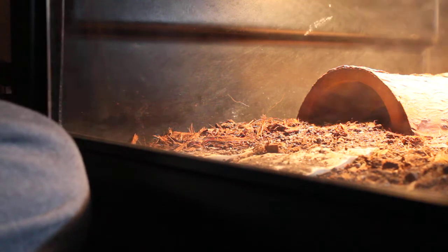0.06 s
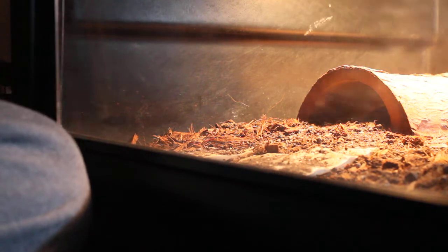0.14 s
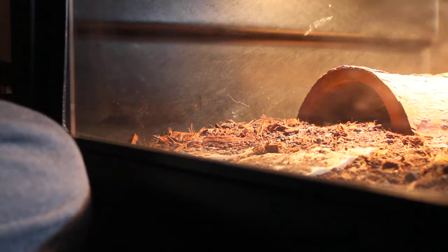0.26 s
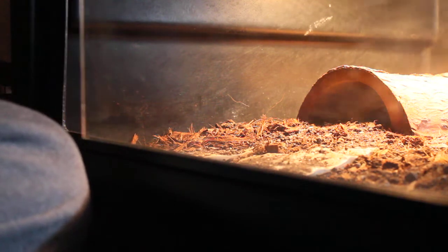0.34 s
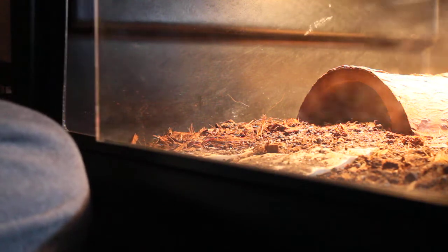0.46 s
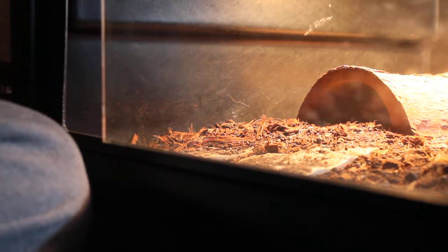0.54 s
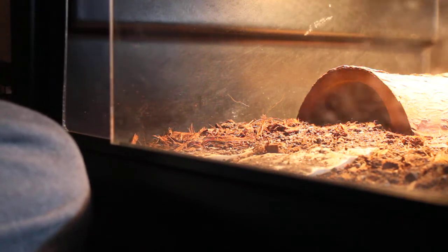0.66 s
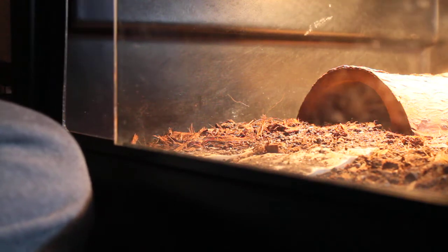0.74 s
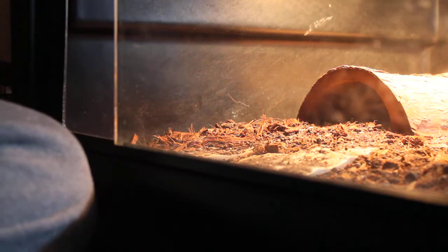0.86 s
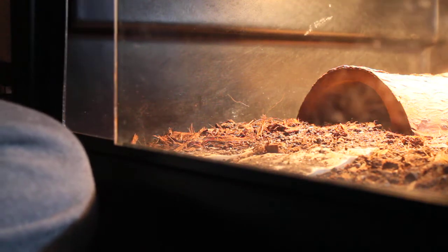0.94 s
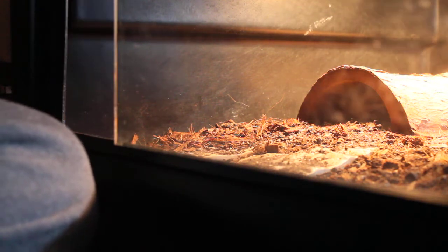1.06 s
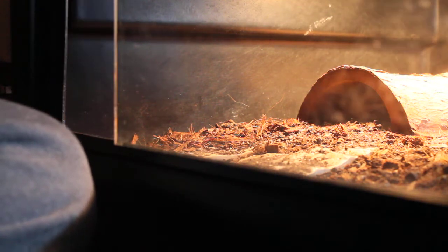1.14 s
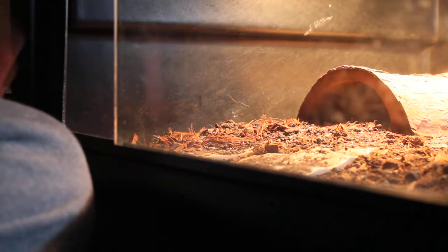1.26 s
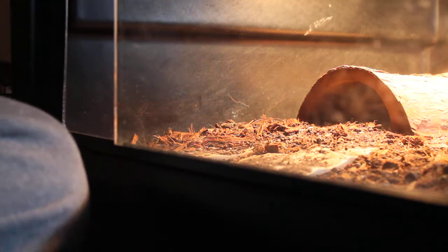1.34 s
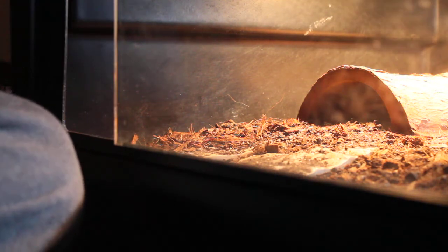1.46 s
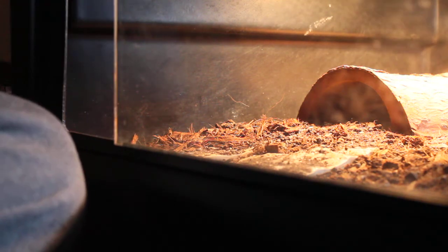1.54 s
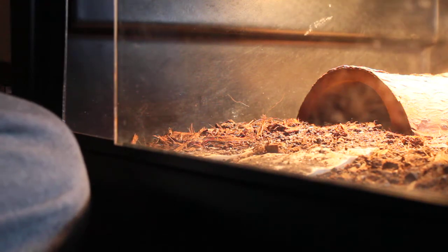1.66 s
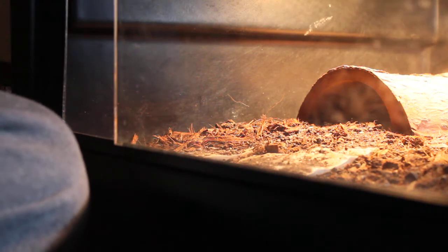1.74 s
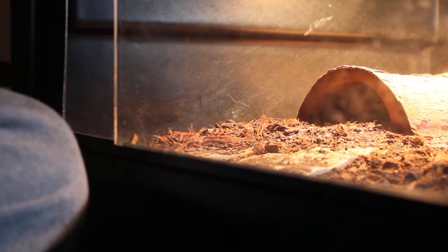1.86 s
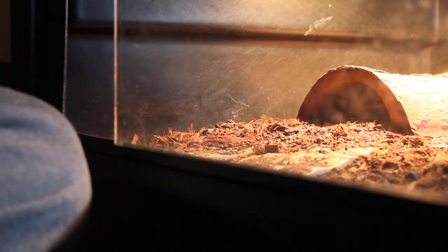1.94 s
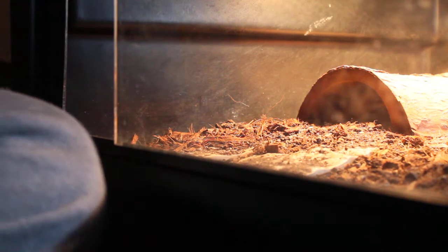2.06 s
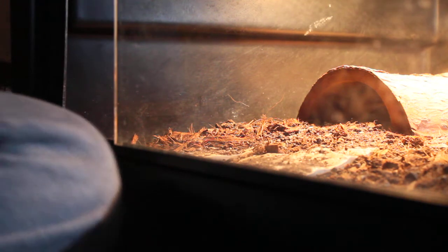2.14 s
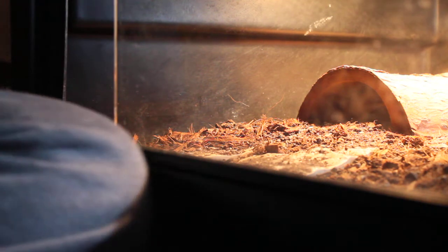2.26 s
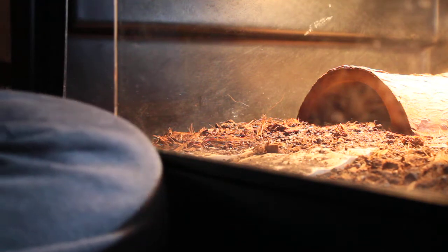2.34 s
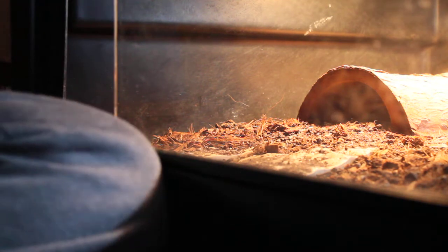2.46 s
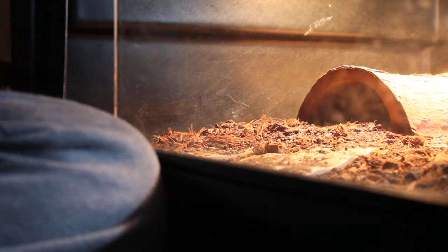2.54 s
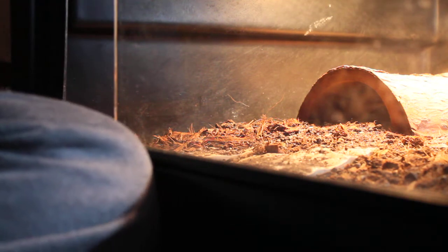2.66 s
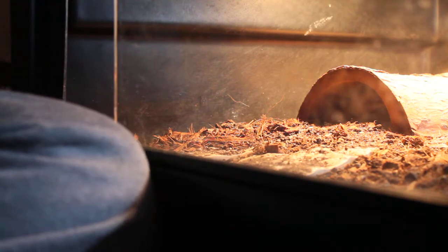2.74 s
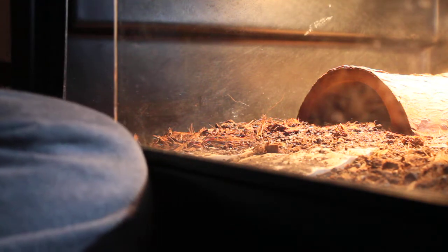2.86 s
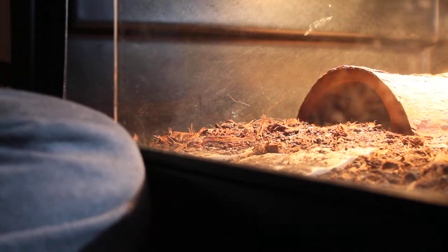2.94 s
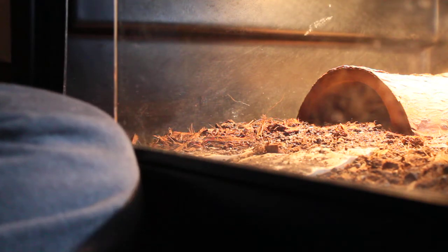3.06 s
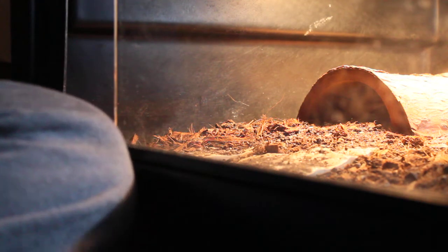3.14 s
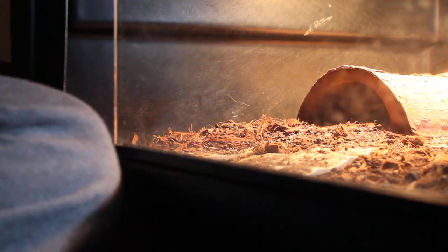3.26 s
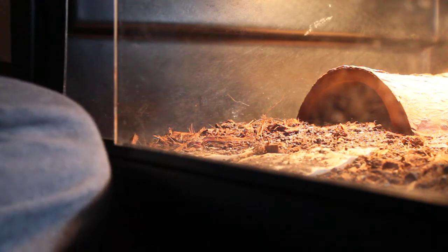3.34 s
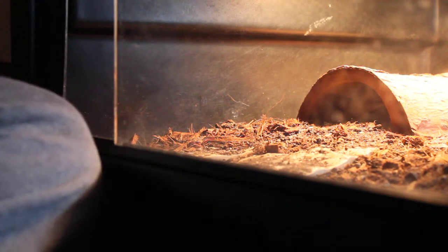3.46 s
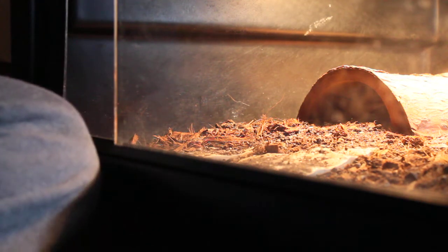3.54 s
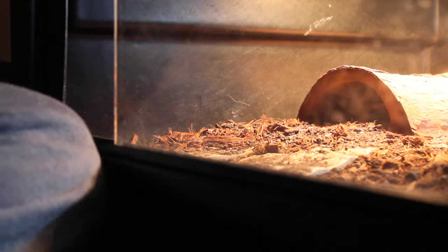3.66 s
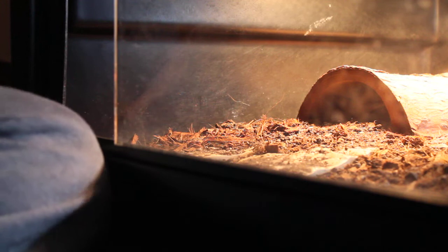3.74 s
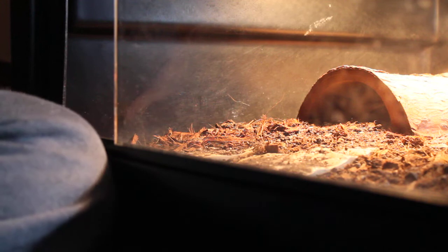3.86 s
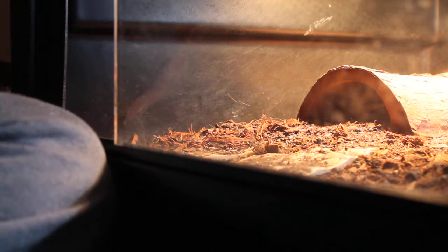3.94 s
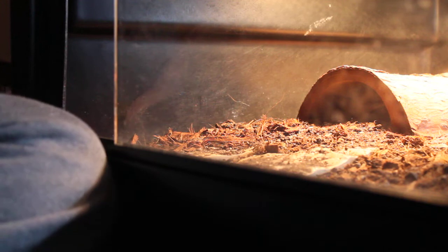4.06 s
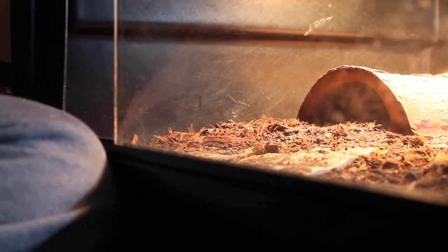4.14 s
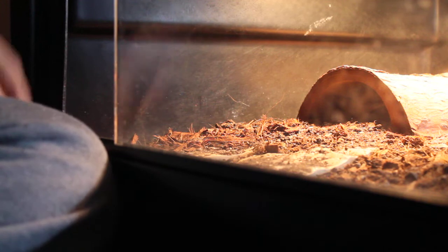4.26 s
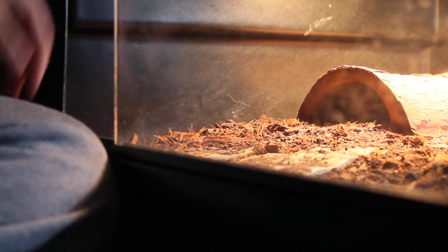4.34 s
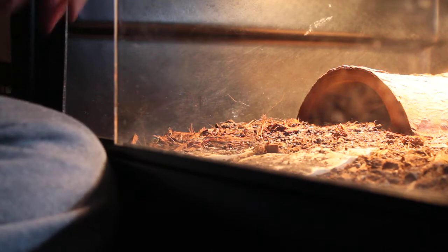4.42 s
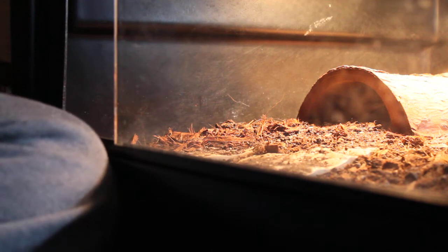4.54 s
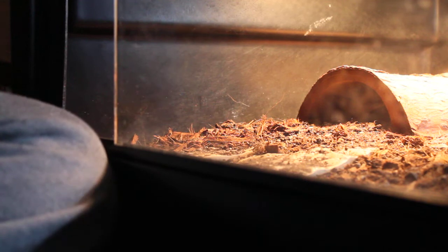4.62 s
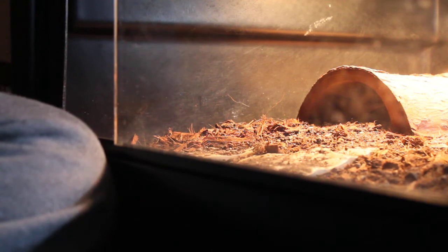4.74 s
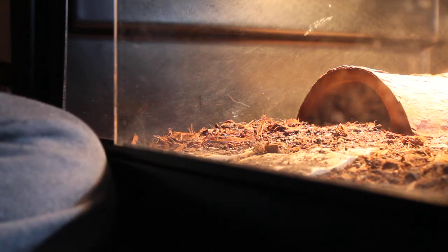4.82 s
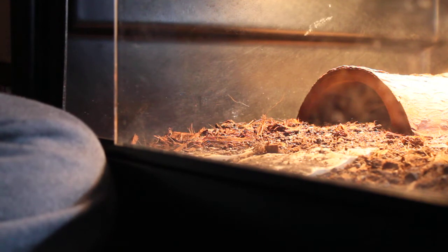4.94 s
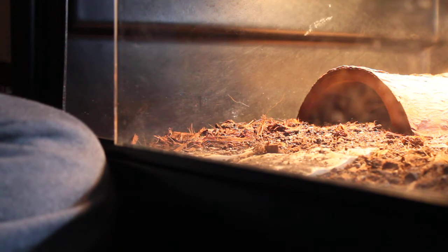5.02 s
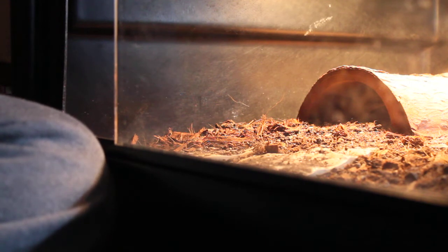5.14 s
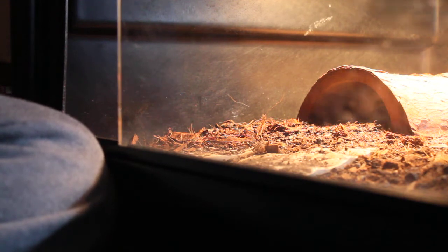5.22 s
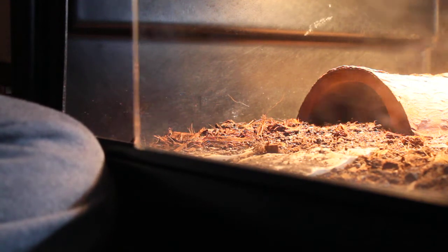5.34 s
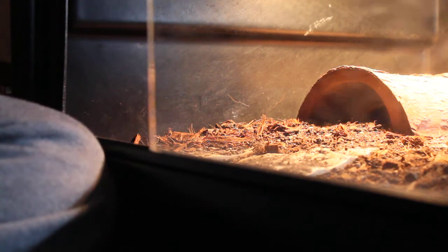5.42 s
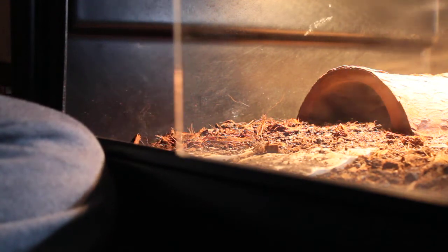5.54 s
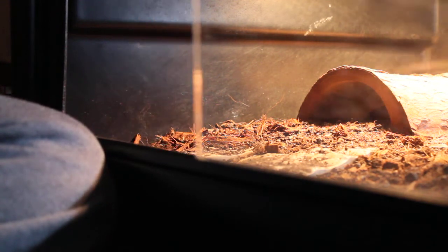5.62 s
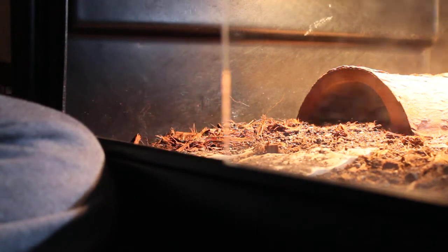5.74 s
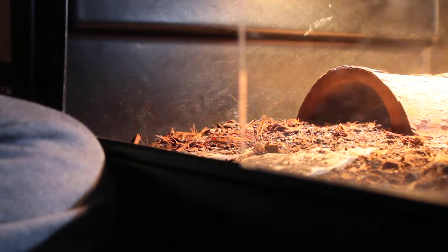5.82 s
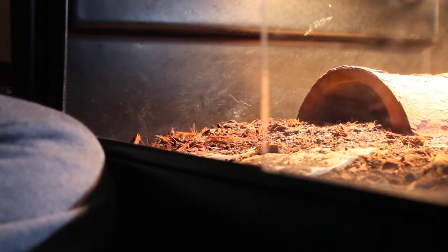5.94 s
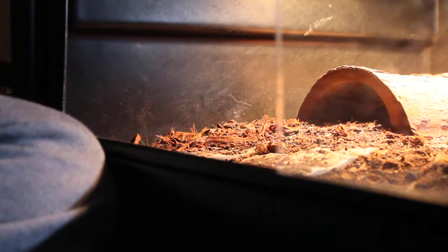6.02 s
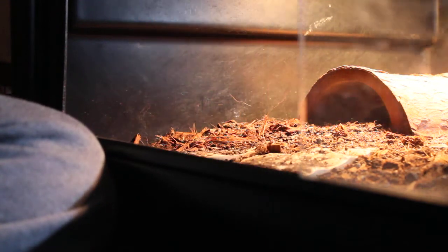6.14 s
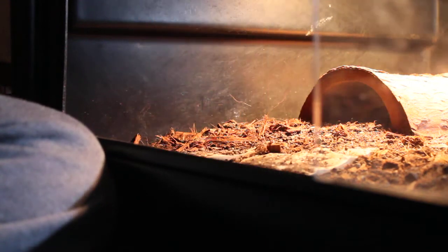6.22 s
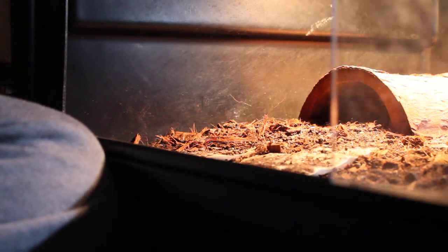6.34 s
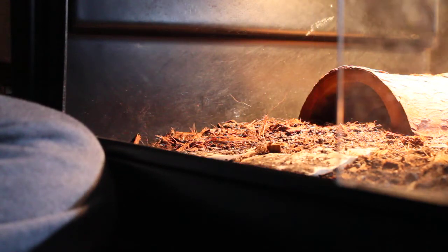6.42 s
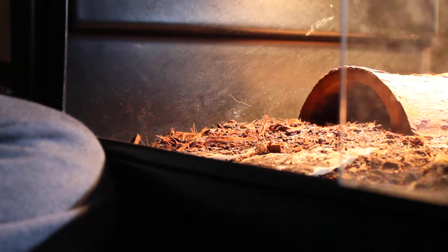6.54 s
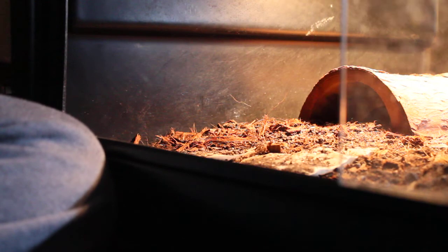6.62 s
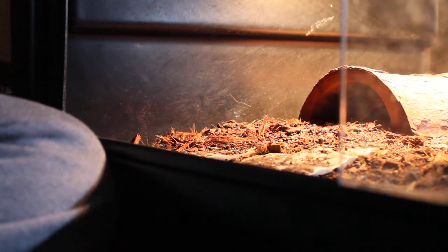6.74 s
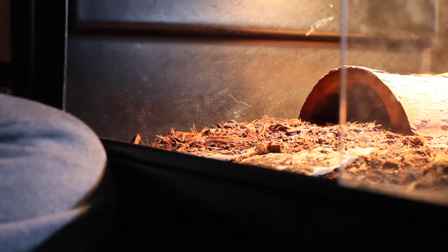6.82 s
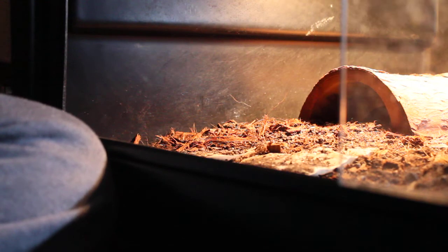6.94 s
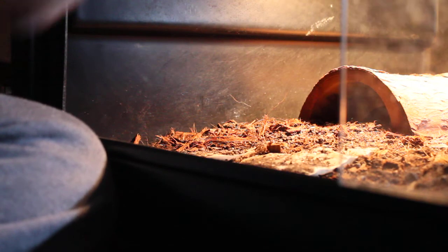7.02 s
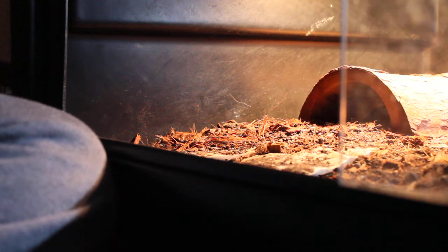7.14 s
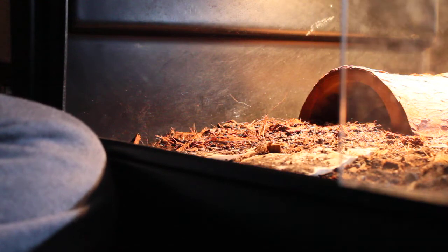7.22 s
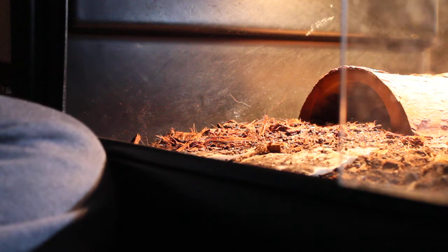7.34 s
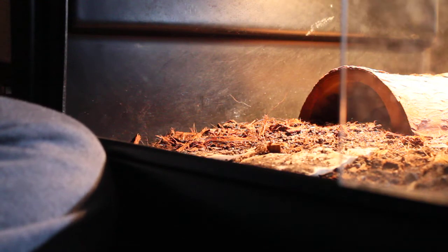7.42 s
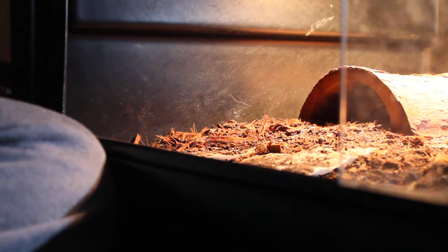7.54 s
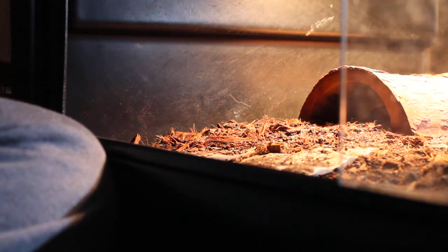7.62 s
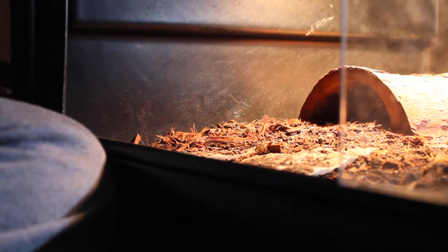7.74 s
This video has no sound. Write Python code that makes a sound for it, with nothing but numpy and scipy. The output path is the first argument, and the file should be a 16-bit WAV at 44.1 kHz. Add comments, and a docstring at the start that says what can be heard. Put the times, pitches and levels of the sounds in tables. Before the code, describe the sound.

Close up in a quiet room, a sliding glass door scrapes along a gritty track, chattering with bright clicks, then knocks its ringing frame. Clothing rustles, a cabinet is softly bumped and creaks, and one dry snap cuts through. A second glass door starts with a groan and brief squeal, scrapes for about a second, and rocks in its groove with several fading knocks.

```python
"""Quiet room: two glass doors of a terrarium are pushed along their gritty plastic track.
The first scrapes, chatters amid sharp clicks and is knocked against the frame; a knee shifts in cloth and
bumps the creaking cabinet; one dry snap; the second door slides with a groan and squeal, then rocks in its groove.
Scrapes are random catches filtered by pane resonances; blows are noise thuds with tails and decaying modes;
cloth and room hush are coloured noise.
"""
import sys
import numpy as np
from scipy import signal
from scipy.fft import rfft, irfft, next_fast_len
from scipy.io import wavfile
from scipy.ndimage import map_coordinates

SR = 44100
rng = np.random.default_rng(int(sys.argv[2]) if len(sys.argv) > 2 else 0)


def output_pcm(signal):
    """Save a mono or channel-first signal as 16-bit PCM at the path in sys.argv[1].

    Samples are clipped to [-1, 1] before scaling.
    """
    pcm = np.clip(np.atleast_2d(signal).T, -1, 1) * 32767
    wavfile.write(sys.argv[1], SR, np.round(pcm).astype(np.int16))


N = 343098
TIME = np.arange(N) / SR


def from_db(db):
    """Decibels as gain."""
    return 10 ** (np.asarray(db) / 20)


def rms_one(x):
    """The same sound at rms 1."""
    return x / np.sqrt(np.mean(x ** 2) + 1e-20)


def at_hz(points, hz):
    """A table read on a log-frequency axis."""
    freqs, values = np.transpose(points)
    return np.interp(np.log(np.maximum(hz, 1)), np.log(freqs), values)


def gain_curve(s, level_db):
    """Gain over time, fading at 600 dB/s outside the first and last point."""
    outside_s = np.maximum(s[0] - TIME, 0) + np.maximum(TIME - s[-1], 0)
    return from_db(np.interp(TIME, s, level_db) - 600 * outside_s)


def swell(s, rise_s, fall_s):
    """Gaussian hump of height 1; rise and fall are 1/e times."""
    out = np.zeros(N)
    near = slice(*np.searchsorted(TIME, [s - 4 * rise_s, s + 4 * fall_s]))
    t = TIME[near] - s
    out[near] = np.exp(-(t / np.where(t < 0, rise_s, fall_s)) ** 2)
    return out


def cut(x, hz, kind, order=2):
    """Butterworth low-, high- or band-pass."""
    sos = signal.butter(order, np.clip(hz, 10, .45 * SR), kind, fs=SR, output="sos")
    return signal.sosfilt(sos, x + 1e-18)


def colour(x, spectrum, resonances=()):
    """Minimum-phase filter: broad spectrum plus resonances (centre Hz, width Hz, lift dB)."""
    size = 2 * next_fast_len(len(x) // 2 + 4096)
    hz = np.arange(size // 2 + 1) * SR / size
    shape_db = at_hz(spectrum, hz)
    for centre_hz, width_hz, lift_db in resonances:
        shape_db = shape_db + lift_db / (1 + (2 * (hz - centre_hz) / width_hz) ** 2)
    cepstrum = irfft(np.log(from_db(shape_db)))[:size // 2]
    cepstrum[1:] *= 2  # folding makes the filter causal
    response = np.exp(rfft(cepstrum, size))
    return irfft(rfft(x, size) * response)[:len(x)]


def drift(knots_per_s):
    """Slow chance: straight lines between normal random knots."""
    knots = rng.standard_normal(int(N / SR * 400) + 2)
    return np.interp(TIME * knots_per_s, np.arange(len(knots)), knots)


def grains(per_s, spread_db):
    """Clicks at random moments and signs; sizes scatter upward, small ones most often."""
    sizes = from_db(spread_db * np.minimum(rng.exponential(1, N), 4.5))
    signs = rng.choice([-1, 1], N)
    return rms_one(sizes * signs * (rng.random(N) < per_s / SR))


# ringing of tank and room: (frequency [Hz], t60 [s])
TAIL_T60 = [(100, 1), (500, 0.5), (1840, 0.58), (14000, 0.39)]


def tail(stretch=1):
    """One second of dense ringing of tank and room: noise bands, the bass lasting longest."""
    t, white = TIME[:SR], rng.standard_normal(SR)
    edges_hz = np.geomspace(30, SR / 2, 11)
    bins, hz = rfft(white), np.arange(SR // 2 + 1)
    out = np.zeros(SR)
    for low, high in zip(edges_hz, edges_hz[1:]):
        t60_s = stretch * at_hz(TAIL_T60, np.sqrt(low * high))
        out += irfft(bins * (hz >= low) * (hz < high), SR) * from_db(-60 * t / t60_s)
    return out


def add(out, s, sound):
    """Mix a sound in at a given moment."""
    start = max(round(s * SR), 0)
    out[start:start + len(sound)] += sound[:N - start]


# hush colour: (frequency [Hz], density [dB per Hz])
AIR_COLOUR = [(25, -39), (55, -8.5), (110, -9.5), (330, -4), (800, -9.5), (1450, -8.5), (4200, -12.5),
              (9000, -21), (15500, -30)]
AIR_DB = -59


def air():
    """The steady hush of the room: coloured noise."""
    return from_db(AIR_DB) * rms_one(colour(rng.standard_normal(N), AIR_COLOUR))


def wander(x, depth_db, spacing_hz, changes_per_s):
    """The pane bears on new spots, so its close-packed modes swell and sink each in its own time."""
    hz, s, frames = signal.stft(x, SR, nperseg=2048)
    chance = rng.standard_normal((512, 256))
    grid = np.meshgrid(hz / spacing_hz, s * changes_per_s, indexing="ij")
    strengths = map_coordinates(chance, grid, order=1, mode="wrap")
    return signal.istft(frames * from_db(depth_db * strengths), SR)[1][:N]


# pane binds on rough track and judders harder:
# (time [s], 1/e half-length [s], lift [dB], centre [Hz], 1/e spread [octaves])
BINDS = [(0.216, 0.057, 5, 1780, 2.4), (0.36, 0.066, 10, 1220, 1.16), (0.52, 0.11, 5.5, 206, 3.1),
         (0.714, 0.071, 10.5, 402.5, 2.3), (5.3, 0.14, 13.5, 690, 1.06), (5.355, 0.07, 8, 1750, 0.3),
         (5.7, 0.071, 3.5, 594, 4.2), (6.214, 0.037, 9.5, 222, 1.8), (6.325, 0.087, 11, 372, 3.85),
         (6.472, 0.064, 9.5, 280, 2.5)]


def push_gain(push, follows, hz):
    """Gain of one register: rises with speed, sags, lifts where the pane binds, dies after the stop."""
    start_s, rise_s, slowing_db_per_s, stop_s, braking_db_per_s = push
    slowing_share, braking_share = follows
    speed = np.sin(np.pi / 2 * np.clip((TIME - start_s) / rise_s, 0, 1)) ** 2
    slowed_db = slowing_share * slowing_db_per_s * np.maximum(TIME - start_s - rise_s, 0)
    braked_db = braking_share * braking_db_per_s * np.maximum(TIME - stop_s, 0)
    bound_db = np.zeros(N)
    for s, half_s, lift_db, centre_hz, octaves in BINDS:
        nearness = np.exp(-(np.log2(hz / centre_hz) / octaves) ** 2)
        bound_db += lift_db * nearness * swell(s, half_s, half_s)
    return speed * from_db(bound_db - slowed_db - braked_db)


# glass scraping in the track: (frequency [Hz], density [dB per Hz])
SCRAPE_COLOUR = [(30, -51), (55, -9), (80, -14.5), (130, -5.5), (280, -7), (600, -5), (1200, 0),
                 (2150, -14.5), (4300, -20), (7000, -19.5), (15500, -31.5)]
# resonances both panes share: (frequency [Hz], lift [dB])
GLASS_MODES = [(1950, 4.2), (2450, 7.4), (2700, 5.5), (3230, 6.8), (4390, 2.7), (5320, 2), (5860, 4.9),
               (6820, 2.5)]
# registers, cabinet boom to grit hiss: edges [Hz]
ZONE_EDGES_HZ = [45, 250, 600, 2100, 4800, 17000]
# how closely each register follows the pane: (share of slowing [ratio], share of braking [ratio])
ZONE_FOLLOWS = [(0.5, 0.23), (0.8, 0.91), (0.85, 0.5), (1.0, 0.93), (1.051, 0.78)]
# both pushes, first and second door:
# (start [s], speeding-up [s], slowing [dB/s], stop [s], braking [dB/s]); rates before the shares above
PUSHES = [(-0.55, 0.97, 34, 0.78, 112), (5.168, 0.18, 10, 6.335, 70)]
WIDTH_HZ, WIDTH_SHARE = 12.9, 0.018  # resonance width: fixed part, plus share of its frequency


def slide(push, zones_db, pane, contacts_per_s, spread_db, judder_db, ring_db):
    """Tiny catches of the glass edge shake the cabinet, ring the pane and hiss in the grit."""
    catches = grains(contacts_per_s, spread_db) * from_db(judder_db * drift(70))
    ringing = tail(stretch=0.25)
    rung = signal.fftconvolve(catches, ringing / np.linalg.norm(ringing))[:N]
    catches = catches + from_db(ring_db) * rung
    resonances = [(hz, WIDTH_HZ + WIDTH_SHARE * hz, lift_db) for hz, lift_db in pane + GLASS_MODES]
    scrape = colour(catches, SCRAPE_COLOUR, resonances)
    scrape = wander(scrape, depth_db=3.0, spacing_hz=74.42, changes_per_s=9)
    out = np.zeros(N)
    for low, high, level_db, follows in zip(ZONE_EDGES_HZ, ZONE_EDGES_HZ[1:], zones_db, ZONE_FOLLOWS):
        register = rms_one(cut(scrape, [low, high], "band", order=4))
        out += from_db(level_db) * register * push_gain(push, follows, np.sqrt(low * high))
    return out


# first pane in its track: (frequency [Hz], lift [dB])
FIRST_PANE = [(109, 14.5), (160, 11), (282, 8.5), (405, 8.5), (523, 9), (895, 7.5), (1134, -3.5),
              (3970, 5.5)]
# register levels at full speed, before sag and binds: level [dB]
FIRST_ZONES_DB = [-38.5, -33.5, -32.5, -32, -37]


def first_slide():
    """The first door scrapes, already moving at the start, with juddering catches."""
    return slide(PUSHES[0], FIRST_ZONES_DB, FIRST_PANE,
                 contacts_per_s=2400, spread_db=0.5, judder_db=0.5, ring_db=-6.5)


# cracking grit and the hard edge of knocks: (time [s], peak before the common lift [dB])
CLICKS = [(0.0245, -9.5), (0.6144, -15), (0.6445, -15.5), (0.648, -14.5), (0.713, -19.5), (0.7755, -26),
          (1.405, -21.5), (2.776, -30), (5.158, -33.5), (6.389, -40)]
# click colour: (frequency [Hz], density [dB per Hz])
CLICK_COLOUR = [(1500, 2), (3500, 9), (7000, 3.5), (11000, 3), (15500, -5.5)]


def clicks(burst_s, burst_db, lift_db):
    """Sharp bright clicks: an impulse, milliseconds of noise and a fainter, longer tail."""
    out, t = np.zeros(N), TIME[:SR // 10]
    for s, peak_db in CLICKS:
        decay = from_db(burst_db) * np.exp(-t / burst_s) + from_db(-31.0) * np.exp(-t / 0.044)
        burst = rng.standard_normal(len(t)) * decay
        burst[0] = 1
        click = colour(burst, CLICK_COLOUR, [(4180, 280, 5.6)])
        add(out, s, from_db(peak_db + lift_db) * click / np.abs(click).max())
    return out


# short ringing chatters and creaks, of the sliding panes and the bumped cabinet:
# (time [s], length [s], ringing [Hz], level over that length [dB])
CHATTERS = [(0.153, 0.025, 524, -21.5), (0.214, 0.043, 2260, -30), (0.275, 0.016, 517, -24.5),
            (0.348, 0.012, 1120, -23.5), (0.366, 0.011, 1010, -22), (0.487, 0.015, 620, -23.5),
            (2.589, 0.0062, 278.6, -40), (2.668, 0.006, 292, -46), (2.757, 0.006, 670, -42),
            (2.769, 0.075, 930, -53), (2.793, 0.007, 566, -41.5), (2.855, 0.0064, 645, -46.5),
            (3.994, 0.0036, 940, -40), (6.099, 0.011, 730, -26.5), (6.277, 0.032, 787, -32)]


def chatters(slips_per_s, slip_s, tail_db, lift_db, width_share, skirt_db):
    """Short chatters and creaks of panes and cabinet: an uneven run of slips rings one resonance."""
    out, t, ringing = np.zeros(N), TIME[:SR], tail(stretch=1.0)
    for s, length_s, hz, level_db in CHATTERS:
        run, at_s = from_db(tail_db) * ringing, 0
        while at_s < length_s:
            slip = rng.standard_normal(SR) * (t >= at_s) * np.exp(-np.abs(t - at_s) / slip_s)
            run = run + rng.uniform(0.75, 1) * slip
            at_s += rng.uniform(.5, 2) / slips_per_s
        skirts = [(hz / 4, skirt_db), (hz, 0), (hz * 10, skirt_db)]
        sound = colour(run, skirts, [(hz, width_share * hz, lift_db)])
        sound = cut(sound, hz * 10, "low")
        add(out, s, from_db(level_db) * sound / np.sqrt(np.sum(sound ** 2) / (length_s * SR)))
    return out


# fibre colour: (frequency [Hz], density [dB per Hz])
CLOTH_COLOUR = [(120, -17.5), (300, -11), (550, -4.5), (1700, -4.5), (6200, -8.5), (15500, -21.5)]
# knee swings, arms reach:
# (time of fastest motion [s], swell [s], fade [s], level [dB], sheen at 9 kHz re 1.5 kHz [dB])
BRUSHES = [(1.25, 0.16, 0.52, -56.5, -8), (1.41, 0.081, 0.081, -53.5, 11), (2.312, 0.2, 0.12, -43, 4),
           (2.92, 0.25, 0.4, -54, -2), (3.42, 0.18, 0.29, -43, -3.5), (3.884, 0.058, 0.15, -42, -2.5),
           (4.32, 0.26, 0.29, -46.5, -3)]


def cloth():
    """Countless fibres slip past each other; each brush swells, fades and has its own sheen."""
    fibres = grains(per_s=20000, spread_db=3.0) * from_db(0.66 * drift(43))
    fibres = colour(fibres, CLOTH_COLOUR)
    out = np.zeros(N)
    for s, rise_s, fall_s, level_db, sheen_db in BRUSHES:
        brush = colour(np.roll(fibres, rng.integers(N)), [(1500, 0), (9000, sheen_db)])
        out += from_db(level_db) * rms_one(brush) * swell(s, rise_s, fall_s)
    return out


def blows(rows, spectrum, modes, attack_s, thud_s, tail_db, modes_db, vary_db, cluster_db):
    """Short thud, dense tail clustered round the body's modes, beating partials; soft contact is duller."""
    out, t = np.zeros(N), TIME[:SR]
    hardest_db = max(row[1] for row in rows)
    clusters = [(hz, 0.063 * hz, max(cluster_db + .5 * mode_db, 0)) for hz, mode_db, _ in modes]
    thud, ringing = rng.standard_normal(SR), tail()  # the same body answers every blow
    for s, level_db, contact_hz in rows:
        rattle = from_db(tail_db + 0.26 * (level_db - hardest_db))  # harder blows rattle loose panes more
        burst = (thud + from_db(vary_db) * rng.standard_normal(SR)) * np.exp(-t / thud_s)
        body = burst + rattle * (ringing + from_db(vary_db) * tail())
        body = colour(body, spectrum, clusters)
        body /= np.sqrt(np.sum(body ** 2) / (.02 * SR))  # energy of 20 ms at rms 1
        for hz, mode_db, t60_s in modes:
            neighbours_hz = hz + (WIDTH_HZ + WIDTH_SHARE * hz) * rng.uniform(-1.01, 1, size=3)
            beating = sum(np.sin(2 * np.pi * (f * t + rng.random())) for f in neighbours_hz)
            knot = np.sin(2 * np.pi * hz * t) + .5 * beating
            build_up = 1 - np.exp(-t * hz / 2)  # time constant of two cycles: bass blooms late
            decay = from_db(modes_db + mode_db - 60 * t / t60_s)
            body += decay * knot * build_up * rng.choice([-1, 1])
        softened = cut(body * (1 - np.exp(-t / attack_s)), contact_hz, "low", order=1)
        add(out, s, from_db(level_db) * softened)
    return out


# glass against frame: (time [s], strength [dB], contact cut-off [Hz])
KNOCKS = [(1.4032, -36, 6000), (1.4222, -19.7, 2600)]
# knock colour: (frequency [Hz], density [dB per Hz])
KNOCK_COLOUR = [(45, -51), (120, -18), (400, -5.5), (1500, -4.5), (2600, -9.5), (5200, -18), (15000, -28)]
# frame ringing: (frequency [Hz], relative level [dB], t60 [s])
FRAME_MODES = [(137, -19, 1.1), (350, -13, .6), (592, -2.5, .42), (797, -11, .35), (915, -6, .45),
               (965, -6, .48), (1093, -10, .35), (1448, -9, .5), (1492, -4.5, .52), (1560, -7, .55),
               (2135, -3, .46)]


def knocks():
    """The first pane hits the frame, which rings."""
    return blows(KNOCKS, KNOCK_COLOUR, FRAME_MODES, attack_s=0.0022, thud_s=0.011,
                 tail_db=-8.0, modes_db=-12.5, vary_db=-9, cluster_db=8.0)


# bumps and creaks of the cabinet: (time [s], strength [dB], contact cut-off [Hz])
BUMPS = [(2.376, -35, 505), (2.391, -28, 9100), (2.408, -26, 1810), (2.629, -44.5, 1200),
         (2.712, -40.5, 2980)]
# bump colour: (frequency [Hz], density [dB per Hz])
BUMP_COLOUR = [(30, -37), (55, -5), (100, -0.5), (800, 4), (1500, 0), (5000, -7), (14000, -16.5)]
# cabinet ringing: (frequency [Hz], relative level [dB], t60 [s])
CABINET_MODES = [(110.5, -18.5, 0.9), (244, -9, 0.21), (416, -4.5, 0.16), (827, -10.5, 0.28)]


def bumps():
    """The cabinet is bumped and creaks, its modes ringing."""
    return blows(BUMPS, BUMP_COLOUR, CABINET_MODES, attack_s=0.0019, thud_s=0.0086,
                 tail_db=-7.5, modes_db=-4.0, vary_db=2, cluster_db=3)


SNAP_S, SNAP_PEAK_DB = 4.3293, -11.5


def snap():
    """One dry, close snap: two quick damped swings and faint reflections."""
    t = TIME[:SR // 10]
    swing = np.sin(2 * np.pi * 1720 * t) * np.exp(-t / .0008)
    swing -= np.sin(2 * np.pi * 5200 * t) * np.exp(-t / .0002)
    paths = rng.standard_normal(len(t)) * (0.04 * np.exp(-t / 0.0026) + 0.004 * np.exp(-t / 0.05))
    paths[0] = 1  # direct sound
    sound = cut(signal.fftconvolve(swing, paths)[:len(t)], [1150, 12000], "band")
    out = np.zeros(N)
    add(out, SNAP_S, from_db(SNAP_PEAK_DB) * sound / np.abs(sound).max())
    return out


# second pane in its track: (frequency [Hz], lift [dB])
SECOND_PANE = [(107, 14.6), (178, 12.3), (270, 9.6), (527, 6), (660, 3.4), (945, 3.8), (1392, 4.5),
               (1468, 7.9), (1696, 9.2)]
# register levels at full speed, before sag and binds: level [dB]
SECOND_ZONES_DB = [-42.5, -39, -33, -31, -35.5]


def second_slide():
    """The second door scrapes with denser, steadier catches."""
    return slide(PUSHES[1], SECOND_ZONES_DB, SECOND_PANE,
                 contacts_per_s=4000, spread_db=0.5, judder_db=0.13, ring_db=-9.5)


# second pane sticks and slips as it gathers speed:
# (time [s], groan [Hz], squeal [Hz], level before each tone's own offset [dB])
STICK_SLIP = [(5.252, 219.3, 1248, -32), (5.285, 335.6, 1280, -23.5), (5.346, 559, 1440, -20.5),
              (5.376, 530, 1472, -24), (5.46, 515, 1520, -37)]


def stick_slip(groan_db, squeal_db, jitter_hz, rough_db):
    """Stick-slip friction: a groan and a rising squeal, rough in pitch and level."""
    s, groan_hz, squeal_hz, level_db = np.transpose(STICK_SLIP)
    out = np.zeros(N)
    for pitch_hz, tone_db in [(groan_hz, groan_db), (squeal_hz, squeal_db)]:
        hz = np.interp(TIME, s, pitch_hz) + jitter_hz * drift(250)
        roughness = from_db(tone_db + rough_db * drift(130))
        out += roughness * np.sin(2 * np.pi * np.cumsum(hz) / SR)
    return out * gain_curve(s, level_db)


# second door rocking in its groove: (time [s], strength [dB], contact cut-off [Hz])
ROCKS = [(6.385, -28, 8000), (6.802, -48.5, 1200), (6.9675, -33, 2500), (7.1305, -37, 1870),
         (7.2505, -37.5, 1900), (7.405, -40.5, 480)]
# rock colour: (frequency [Hz], density [dB per Hz])
ROCK_COLOUR = [(45, -9), (170, 6), (500, 14), (1200, 7), (4200, 3), (8000, -37)]
# door ringing: (frequency [Hz], relative level [dB], t60 [s])
DOOR_MODES = [(108, -9, .65), (178, 0, .38), (440, -6, .2), (490, -5, .2), (640, -5, .2), (840, -5, .25),
              (1095, 1.5, .17), (1410, -7, .22)]


def rocks():
    """The second door, let go, knocks in its groove and rings."""
    return blows(ROCKS, ROCK_COLOUR, DOOR_MODES, attack_s=0.0018, thud_s=0.011,
                 tail_db=-8.5, modes_db=-5, vary_db=-10.0, cluster_db=5)


def scene():
    """Two slides, the blows, clicks and chatters around them, rustling clothes and the room."""
    sharp = clicks(burst_s=0.0026, burst_db=-17.0, lift_db=4.5)
    chattering = chatters(slips_per_s=220, slip_s=0.0028, tail_db=-25,
                          lift_db=10.5, width_share=0.22, skirt_db=-24)
    friction = stick_slip(groan_db=-7.5, squeal_db=-3, jitter_hz=60.5, rough_db=4.0)
    slides = first_slide() + second_slide() + friction
    struck = knocks() + bumps() + rocks()
    mix = air() + slides + sharp + chattering + cloth() + struck + snap()
    return mix[None]


CUTOFF_HZ = 15900


def record(dry):
    """Steep elliptic low-pass."""
    return signal.sosfilt(signal.ellip(12, .1, 80, CUTOFF_HZ, fs=SR, output="sos"), dry)


dry = scene()
out = record(dry)
output_pcm(out)
```